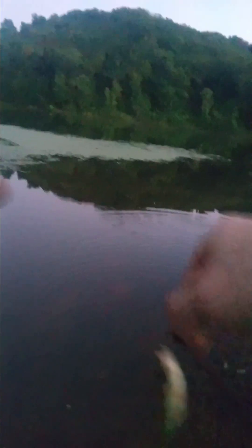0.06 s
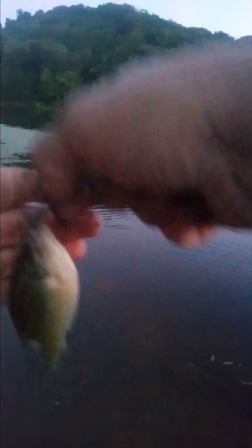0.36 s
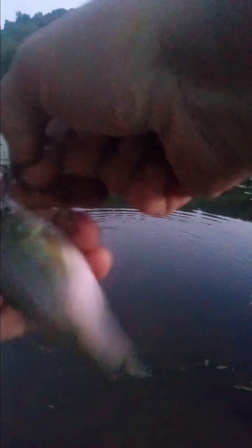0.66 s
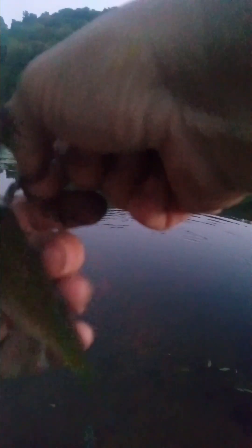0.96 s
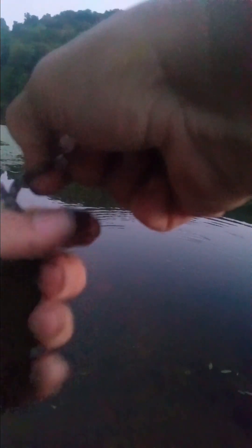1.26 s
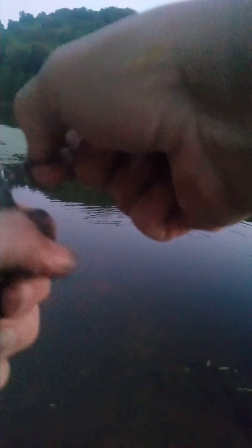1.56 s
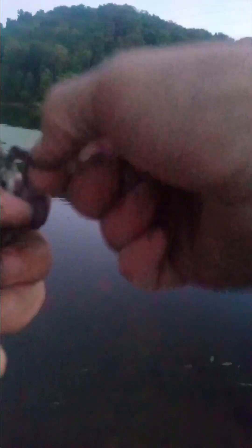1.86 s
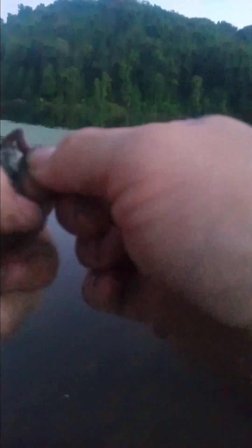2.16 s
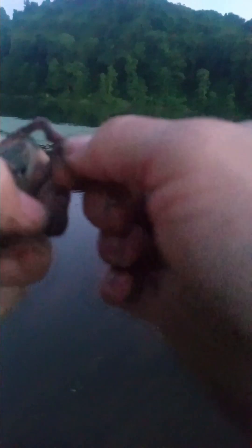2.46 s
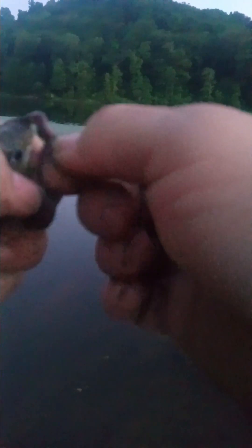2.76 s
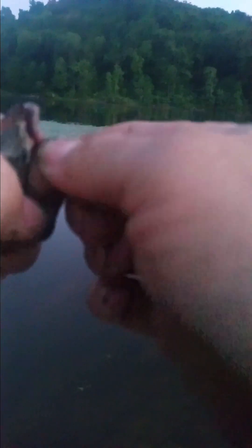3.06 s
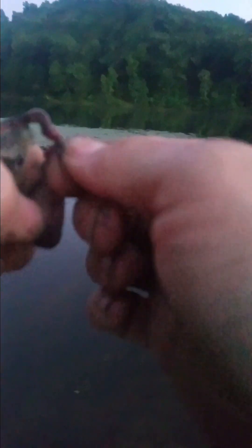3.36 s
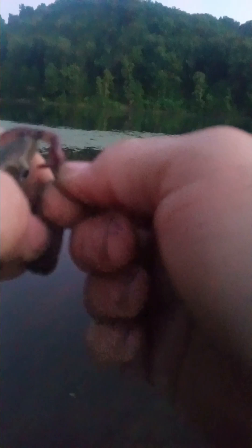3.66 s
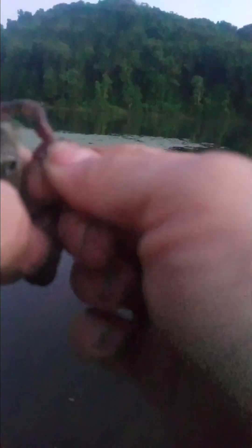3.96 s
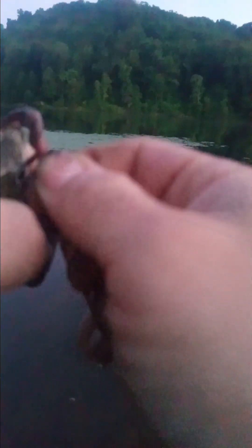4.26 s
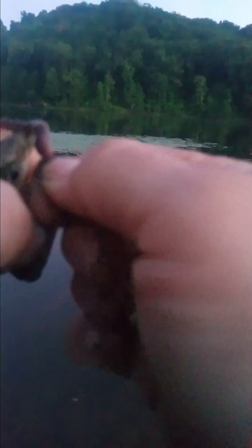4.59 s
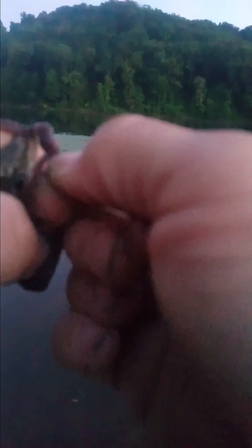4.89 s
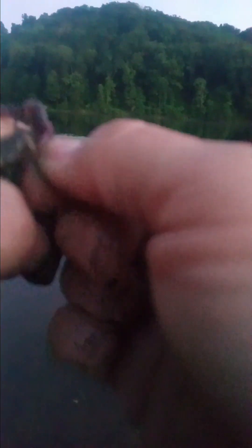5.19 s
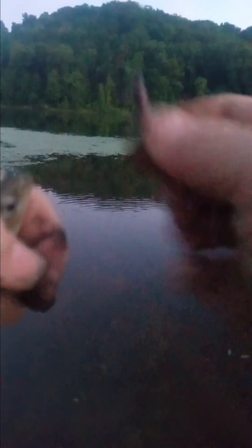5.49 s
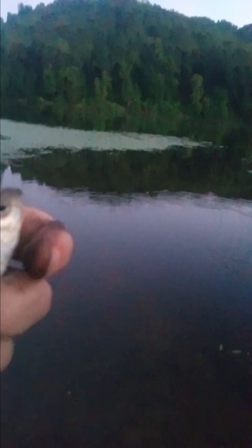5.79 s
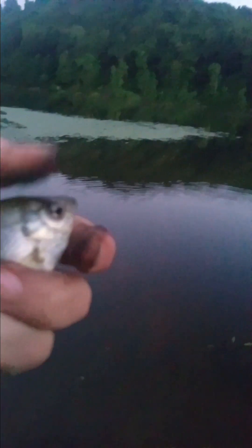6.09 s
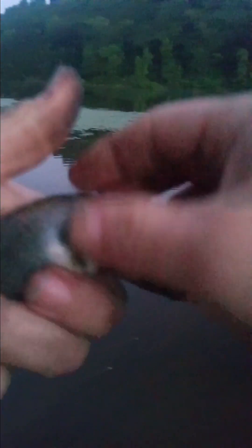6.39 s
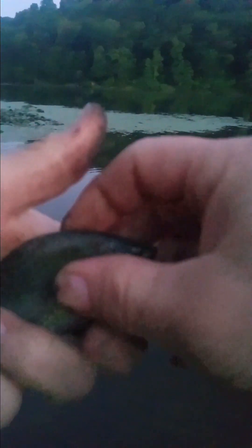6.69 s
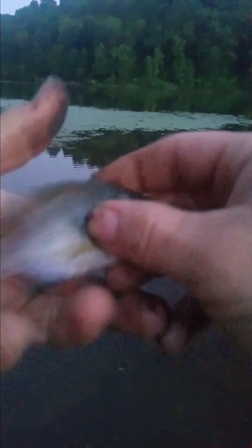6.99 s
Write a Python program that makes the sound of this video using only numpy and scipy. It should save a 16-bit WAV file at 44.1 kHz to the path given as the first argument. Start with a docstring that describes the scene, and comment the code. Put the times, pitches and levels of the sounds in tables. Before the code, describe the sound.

High, pebble-like frog clicks come throughout from different distances along a wooded lake shore, growing busier after the middle. Softer repeating rattles and a distant shimmering chorus sit behind them in the quiet evening air. Right by the microphone, a small fish is handled with occasional faint wet ticks, ending in a short cluster of ticks, skin rubs and soft knocks.

```python
"""Cricket frogs click like pebbles round a still lake at dusk; others answer and rattle from farther off.
Each click is a short run of larynx pulses ringing in the vocal sac, echoed and scattered by the bank.
Right at the phone, wet hands unhook a small fish: sticky ticks, rubs and soft bumps.
Behind it all lie a grainy far chorus, a low evening rumble and a faint hiss."""
import sys
import numpy as np
from scipy import signal
from scipy.fft import rfft, irfft, next_fast_len
from scipy.io import wavfile

SR = 44100
rng = np.random.default_rng(int(sys.argv[2]) if len(sys.argv) > 2 else 0)


def store_pcm(level_fs):
    """Save levels as 16-bit WAV."""
    pcm = np.round(np.clip(level_fs, -1, 1) * 32767).astype(np.int16)
    wavfile.write(sys.argv[1], SR, np.atleast_2d(pcm).T)


N = 314874


def from_db(db):
    return 10 ** (np.asarray(db) / 20)


def rms_one(x):
    return x / np.sqrt(np.mean(x ** 2) + 1e-20)


def butter(x, order, hz, kind):
    return signal.sosfilt(signal.butter(order, hz, kind, fs=SR, output="sos"), x)


def gains(spectrum, size, pitch=1):
    """Rows of f/Hz, gain/dB on the FFT grid; down 14 dB an octave past either end."""
    hz, db = np.transpose(spectrum)
    octave = np.log2(np.maximum(np.fft.rfftfreq(size, 1 / SR), 1) / pitch)
    points = np.log2(hz)
    outside = np.abs(octave - np.clip(octave, points[0], points[-1]))
    return from_db(np.interp(octave, points, db) - 14 * np.minimum(outside, 1))


def colour(x, spectrum, pitch=1):
    """Filter by a spectrum; rms 1."""
    size = next_fast_len(len(x))
    return rms_one(irfft(rfft(x, size) * gains(spectrum, size, pitch), size)[:len(x)])


def add(out, start_s, sound):
    at = int(np.clip(round(start_s * SR), 0, len(out)))
    out[at:at + len(sound)] += sound[:len(out) - at]


def noise_burst(size, decay_ms):
    age = np.arange(size) / SR * 1000 / decay_ms
    return rng.standard_normal(size) * np.sqrt(age) * np.exp(-age)


def scatter(x, t60_s=.086, build_s=.00087):
    """Dense reflections from reeds and trees build up and die away; unit-energy response."""
    t = np.arange(int(t60_s * SR)) / SR
    build_up = 1 - np.exp(-(t / build_s) ** 2)
    tail = rng.standard_normal(len(t)) * from_db(-60 * t / t60_s) * build_up
    return signal.fftconvolve(x, tail / np.linalg.norm(tail))[:N]


# evening rumble: f/Hz, gain/dB
RUMBLE_SPECTRUM = [(25, -29.5), (45, -27), (70, -4), (92, 3), (125, -6), (180, -3), (300, -7.5), (550, -11),
                   (900, -11), (1300, -19.5), (1900, -29.5)]
# microphone hiss: f/Hz, gain/dB
HISS_SPECTRUM = [(900, -13), (1600, 4), (2500, 3), (6000, -4.5), (9000, -18), (13500, -17.5), (15200, -18)]


def still_air(rumble_db=-78.5, hiss_db=-79):
    """Low outdoor rumble and faint hiss."""
    rumble = colour(rng.standard_normal(N), RUMBLE_SPECTRUM)
    hiss = colour(rng.standard_normal(N), HISS_SPECTRUM)
    return from_db(rumble_db) * rumble + from_db(hiss_db) * hiss


# loudness of the farthest frogs: t/s, level/dB
CHORUS_LEVELS = [(0, -58.5), (1.751, -59), (2.3, -61.5), (3.999, -57.5), (4.6, -62), (5.651, -52),
                 (5.998, -58.5), (7.14, -58)]
# their vocal sacs: f/Hz, gain/dB
CHORUS_SPECTRUM = [(1800, -36.5), (2550, -35), (3150, -6.5), (3800, 5), (4300, -7), (4900, -25),
                   (5800, -30), (7500, -41.5), (10000, -56)]


def far_chorus(gain_db=-5, pulses_per_s=600):
    """Pulses of the farthest frogs merge into a grainy shimmer."""
    pulses = (rng.random(N) < pulses_per_s / SR) * rng.standard_normal(N)
    level_db = np.interp(np.arange(N) / SR, *np.transpose(CHORUS_LEVELS))
    return from_db(level_db + gain_db) * colour(pulses + scatter(pulses), CHORUS_SPECTRUM)


# hand on the phone: t/s, length/s, rub level/dB, bump level/dB
HAND_CONTACTS = [ (.328, .034, -66, -54), (0.588, .036, -60.5, -45), (4.764, 0.036, -56.5, -67),
                 (6.726, 0.038, -55.5, -51), (6.771, 0.043, -50, -55), (6.846, .058, -46.5, -53),
                 (6.998, 0.04, -60.5, -57.5), (7.047, 0.064, -55, -51.5), (7.097, .029, -41, -36), ]
# skin on the case: f/Hz, gain/dB
RUB_SPECTRUM = [(400, 16), (1200, -44), (2500, 20), (5000, 8.5), (7800, 16), (10500, -3), (15500, -23)]
# phone body: f/Hz, gain/dB
BUMP_SPECTRUM = [(25, -19), (60, -5), (105, 8), (170, -6), (240, -10.5), (420, -17.5), (800, -23),
                 (1600, -34.5)]


def hand_brushes(grain_db=7, knock_band_hz=(220, 440), knock_db=-6, firm_rub_db=-43):
    """Skin sticks and slips on the case, which knocks hollowly; the push thuds through the body."""
    out, size = np.zeros(N), SR // 10
    t = np.arange(size) / SR
    for start_s, length_s, rub_db, bump_db in HAND_CONTACTS:
        slips, grains, push = rng.standard_normal((3, size))
        contact = np.sin(np.pi * np.minimum(t / length_s, 1) ** .52) ** 2
        rub = colour(slips * from_db(grain_db * grains), RUB_SPECTRUM)
        knock = from_db(knock_db) * rms_one(butter(slips, 2, knock_band_hz, "band"))
        pitch = 1 + .4 * from_db(rub_db - firm_rub_db)   # firmer thuds higher
        bump = colour(push, BUMP_SPECTRUM, pitch)
        add(out, start_s, contact * (from_db(rub_db) * (rub + knock) + from_db(bump_db) * bump))
    return out


# wet skin and fins: t/s, peak level/dB, ring f/Hz
STICKY_TICKS = [ (.329, -55, 8670), (.507, -51, 8000), (.545, -50, 6260), (.63, -36.5, 3840),
                (0.699, -42, 7860), (1.63, -31.5, 7160), (2.508, -43, 7640), (3.459, -50.5, 6260),
                (3.831, -48, 6000), (4.7679, -24, 3620), (6.741, -40, 2760), (6.781, -36, 2700),
                (6.867, -37, 3050), (6.906, -41, 7100), (7.002, -39, 2860), (7.0636, -25.5, 3070),
                (7.0744, -27, 7040), (7.101, -22.5, 3380), ]


def wet_ticks(top_hz=9000, crack_db=-29, broad_db=-22, usual_width_hz=1360, usual_db=-40):
    """A water film parts: a tiny burst rings between skin and fish, with a faint bright crack."""
    out = np.zeros(N)
    for start_s, peak_db, ring_hz in STICKY_TICKS:
        width_hz = usual_width_hz * from_db(.33 * (peak_db - usual_db))   # harder rings broader
        band_hz = [max(ring_hz - width_hz / 2, 300), ring_hz + width_hz / 2]
        burst = butter(noise_burst(SR // 25, decay_ms=1.11), 3, 1800, "high")   # too small for bass
        ring = butter(burst, 2, band_hz, "band")
        crack = from_db(crack_db) * (width_hz / 4000) ** 2 * burst
        tick = butter(ring + from_db(broad_db) * burst, 6, top_hz, "low") + crack
        add(out, start_s, from_db(peak_db) * tick / np.abs(tick).max())
    return out


def wooded_shore(frogs, t60_s=.55, band_hz=(2900, 4600), gain_db=-24):
    """The trees return a faint, duller tail."""
    return from_db(gain_db) * butter(scatter(frogs, t60_s), 2, band_hz, "band")


PULSE_SAMPLES, SWELL_SAMPLES = 1024, 128


def larynx_buzz():
    """Ragged spectrum of one short, unit-energy buzz."""
    buzz = noise_burst(PULSE_SAMPLES, decay_ms=.99)
    return rfft(buzz / np.linalg.norm(buzz))


def sac_pulse(sac, pitch, buzz, taut=0, width_hz=258, boost_db=6.5, abruptness=.57, rasp=.68, drive=.9):
    """One larynx snap in the sac: a quick swell, then a ring, longer when taut; peak 1."""
    hz = np.fft.rfftfreq(PULSE_SAMPLES, 1 / SR)
    main_hz = pitch * max(sac, key=lambda point: point[1])[0]
    detuning = (hz - main_hz) / (width_hz / 2)
    resonance = from_db(boost_db * taut / (1 + detuning ** 2))
    log_gain = np.log(gains(sac, PULSE_SAMPLES, pitch) * resonance)
    cepstrum = irfft(log_gain)
    cepstrum[PULSE_SAMPLES // 2:] = 0
    struck_phase = 2 * rfft(cepstrum).imag   # resonator struck all at once
    response = np.exp(log_gain + 1j * abruptness * struck_phase)
    # clean main ring, buzzy overtones
    buzz_share = rasp * np.minimum(np.abs(hz / main_hz - 1) / .5, 1) ** 3
    snap = np.sqrt(1 - buzz_share) + np.sqrt(buzz_share) * buzz
    ring = np.roll(irfft(snap * response), SWELL_SAMPLES) * signal.windows.tukey(PULSE_SAMPLES, .2)
    # a taut sac saturates and holds its swing a few cycles
    swing = np.abs(signal.hilbert(ring))
    ring /= np.sqrt(1 + (drive * taut * swing / swing.max()) ** 2)
    return ring / np.abs(ring).max()


def faint_clicks(clicks_per_s=3, level_db=-48, spread_db=.5):
    """Other far frogs chime in at random, two or three pulses a click."""
    starts_s = np.flatnonzero(rng.random(N) < clicks_per_s / SR) / SR
    levels_db = level_db + spread_db * rng.standard_normal(64)
    pulse_counts = 2 + (rng.random(64) < .5)
    return across_water("far", click_voice("far", zip(starts_s, levels_db, pulse_counts)))


# steady rattler's effort: t/s, level/dB
RATTLE_LEVELS = [(.2, -45.5), (.62, -41), (1.45, -37.5), (2.2, -43), (3.2, -37), (4.3, -42), (5.2, -48),
                 (6.0, -54.5), (6.8, -50)]
# neighbour's rattles: t/s, level/dB
RATTLE_REPLIES = [(3.809, -37), (5.019, -38), (5.404, -41), (5.851, -46.5), (6.075, -45), (6.576, -47.5)]
# their vocal sacs: f/Hz, gain/dB
RATTLE_SPECTRUM = [(2200, -46.5), (2900, -23.5), (3400, -11.5), (3850, 6.5), (4200, -6.5), (4600, -19),
                   (5050, -41), (5700, -38), (7500, -54.5)]


def rattling_frogs(every_s=.414, gap_s=.0078, uneven_db=2, waver=.022, stumble_s=.0018, direct_db=-2.5):
    """Uneven pulse runs swell and fade, blurred by distance: one steady caller, one shorter and lower."""
    beats_s = np.arange(.207, N / SR, every_s)
    steady = zip(beats_s, np.interp(beats_s, *np.transpose(RATTLE_LEVELS)))
    out = np.zeros(N)
    for calls, length_s, pitch in [(steady, .18, 1.005), (RATTLE_REPLIES, .13, .96)]:
        for start_s, level_db in calls:
            buzz = larynx_buzz()
            jitter = rng.standard_normal((64, 3))
            for t, (slip, strength, detune) in zip(np.arange(0, length_s, gap_s), jitter):
                gain = np.sin(np.pi * t / length_s) * from_db(level_db + uneven_db * strength)
                ring = sac_pulse(RATTLE_SPECTRUM, pitch * (1 + waver * detune), buzz)
                add(out, start_s + t + stumble_s * slip, gain * ring)
    return from_db(direct_db) * out + scatter(out)


# path per frog: scatter gain/dB, bank echoes as (delay/ms, gain/dB)
BANK_PATHS = { "near": (-7.5, [(2.6, -19.5), (4.4, -32.5)]), "mellow": (-5.5, [(3.2, -6), (6.9, -9)]),
              "deep": (-2, [(2.9, -4.5), (5.3, -5)]), "hollow": (-8, [(2.0, -8), (4.1, -4.5)]),
              "far": (-1.4, [(4.2, -3.5), (6.6, -11)]), "thin": (-1, [(2, -6.5)]), }


def across_water(frog, voice, reeds_hz=7150):
    """Direct sound, bank echoes, and scatter from reeds that swallow the top overtones."""
    scatter_db, echoes = BANK_PATHS[frog]
    out = voice + from_db(scatter_db) * scatter(butter(voice + 1e-18, 2, reeds_hz, "low"))
    for delay_ms, echo_db in echoes:
        add(out, delay_ms / 1000, from_db(echo_db) * voice)
    return out


# vocal sac per frog: f/Hz, gain/dB
SAC_SPECTRA = { "near": [(1100, -81.5), (1700, -30.5), (2050, -36), (2600, -15.5), (2950, -14), (3350, -6),
               (3900, -3), (4400, -9.5), (5150, -26.5), (5800, -19.5), (7000, -35.5), (7500, -36.5),
               (9800, -55), (11500, -73)], "mellow": [(1200, -63), (1850, -27), (2600, -27.5), (3250, -0.5),
               (3680, 1), (4050, -15), (4500, -37), (5450, -26.5), (6100, -44.5), (7300, -35.5),
               (7900, -67.5), (8500, -47), (9500, -69.5)], "deep": [(1300, -54.5), (2000, -29.5),
               (2550, -31.5), (3000, -6.5), (3400, -2), (3950, -5.5), (4450, -26), (5600, -28),
               (6900, -30.5), (7900, -52), (8500, -43), (9300, -71)], "hollow": [(1300, -55.5), (2250, -18),
               (2620, -7), (3050, -15), (3330, -5), (3520, -16), (3820, -1.5), (4300, -11), (5200, -38),
               (6100, -31.5), (7000, -40.5), (7500, -16.5), (8200, -38.5), (10000, -55.5)],
               "far": [(1800, -39.5), (2550, -29), (2950, -9.5), (3420, 4.5), (3950, 5.5), (4700, -40.5),
               (5200, -32), (5700, -17.5), (6600, -36.5), (8500, -54)], "thin": [(1400, -40.5),
               (2500, -25.5), (3100, -8), (3550, -3.5), (4150, -2), (4800, -23.5), (5600, -16.5),
               (6500, -29.5), (7400, -17), (8300, -50.5)], }
# habit per frog: usual level/dB, base pulse gap/ms, pitch ratio, last pulse gain/dB, last pulse pitch sag
CLICK_HABITS = { "near": (-18.5, 6.5, 1.0, -4.5, .055), "mellow": (-19.5, 11, 1.02, -8.5, .02),
                "deep": (-23.5, 8.5, 1.0, -6.5, .02), "hollow": (-24, 6, .99, -5, .03),
                "far": (-40.5, 8.5, 0.99, -5.5, .04), "thin": (-34.5, 5.5, 1.0, -3, .02), }


def click_voice(frog, clicks, colour_spread_db=1.3, pitch_per_db=.007, quickening=.15, low_cut_hz=1380):
    """Pulses quicken through a click; as air runs out the slack sac rings weaker, lower and shorter."""
    usual_db, base_gap_ms, usual_pitch, last_db, last_sag = CLICK_HABITS[frog]
    voice = np.zeros(N)
    for at_s, click_db, pulse_count in clicks:
        buzz = larynx_buzz()
        sac = [(hz, db + rng.normal(0, colour_spread_db)) for hz, db in SAC_SPECTRA[frog]]
        pitch = usual_pitch * (1 + pitch_per_db * (click_db - usual_db))   # a push tightens the sac
        gap_s = base_gap_ms / 1000 * (pulse_count / 4) ** .37   # longer clicks start slower
        for spent in np.linspace(0, 1, pulse_count):
            pulse_db = click_db + last_db * spent ** 1.9 + rng.normal(0, .29)
            ring = sac_pulse(sac, pitch * (1 - last_sag * spent ** 3), buzz, taut=1 - spent ** 2)
            add(voice, at_s - SWELL_SAMPLES / SR, from_db(pulse_db) * ring)
            at_s += gap_s * (1 - quickening * spent) * (1 + rng.normal(0, .03))
    return butter(voice + 1e-18, 6, low_cut_hz, "high")   # no sound below the clicks' band


# clicks per frog: t/s, level/dB, pulse count
FROG_CLICKS = { "near": [(.3991, -22, 2), (.4107, -18.5, 2), (1.0961, -15.5, 4), (1.8522, -17, 4),
               (2.2604, -17.5, 3), (3.1121, -16.5, 4), (3.4973, -15.5, 2), (3.9541, -16.5, 4),
               (4.2954, -17.5, 1), (4.3661, -17, 1), (5.1478, -16, 4), (5.5003, -18, 1), (5.539, -17.5, 3),
               (5.855, -16.5, 1), (6.3836, -17, 6), (6.7538, -18, 1), (6.8148, -15.5, 1), (7.0569, -19, 1),
               (7.124, -19.5, 1)], "mellow": [(.8944, -19.5, 3), (1.1373, -20.5, 4), (1.3529, -21, 1),
               (1.3672, -21, 4), (5.6063, -21.5, 2), (5.648, -20, 3)], "deep": [(2.5185, -25, 4),
               (2.75, -25, 5), (2.938, -26, 5), (3.7608, -23, 4), (3.8005, -20.5, 1), (3.826, -30, 2),
               (4.026, -24.5, 1), (4.0454, -26, 1), (4.089, -23, 1), (4.1205, -27.5, 3), (5.1085, -24, 4),
               (5.3667, -22.5, 5), (5.7286, -29, 2), (7.0942, -28, 4), (7.1285, -24, 2)],
               "hollow": [(1.015, -33.5, 1), (2.0843, -31, 1), (4.524, -24, 1), (5.177, -25.5, 1),
               (6.548, -20, 1)], "far": [(.047, -39, 3), (.16, -41.5, 2), (.7653, -35, 1), (.84, -39.5, 3),
               (1.242, -38, 2), (1.46, -40, 2), (1.794, -40, 3), (2.191, -46, 1), (2.882, -44, 2),
               (3.408, -47, 2), (4.628, -44, 1), (4.892, -41, 2), (4.97, -44, 3), (5.073, -37, 3),
               (5.814, -35.5, 2), (6.239, -43.5, 4)], "thin": [(1.041, -37, 4), (2.722, -33, 4),
               (5.026, -31, 3), (5.4274, -33.5, 2), (5.7557, -39.5, 2), (6.111, -36, 2)], }


def clicking_frogs():
    """Each frog clicks from its own place on the bank."""
    return sum(across_water(frog, click_voice(frog, clicks)) for frog, clicks in FROG_CLICKS.items())


def scene():
    """Evening air, wet hands, frogs and their shore; mono."""
    background = still_air() + far_chorus()
    hands = wet_ticks() + hand_brushes()
    frogs = clicking_frogs() + rattling_frogs()
    return (background + hands + wooded_shore(frogs) + faint_clicks() + frogs)[None]


def record(dry):
    """The phone cuts the top."""
    cutoff_hz = 15600
    return signal.sosfilt(signal.ellip(10, .1, 80, cutoff_hz, fs=SR, output="sos"), dry)


dry = scene()
out = record(dry)
store_pcm(out)
```